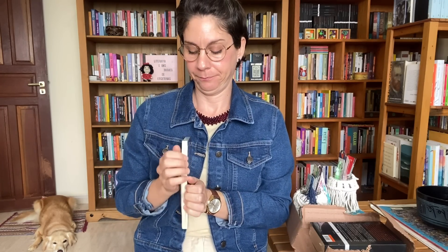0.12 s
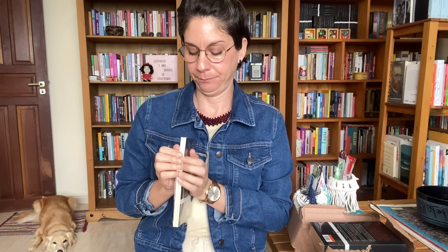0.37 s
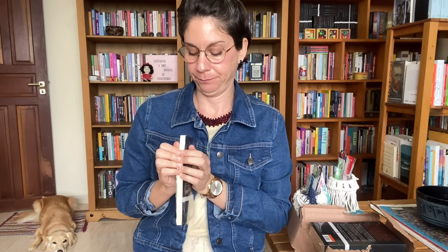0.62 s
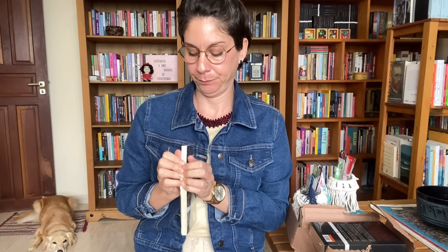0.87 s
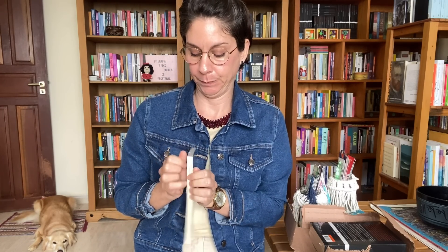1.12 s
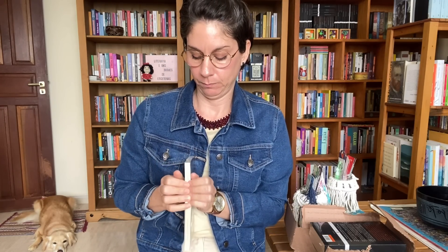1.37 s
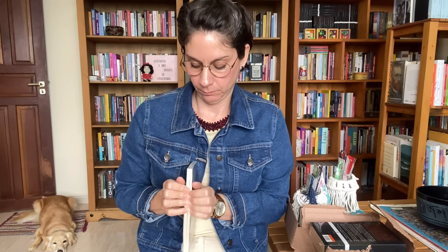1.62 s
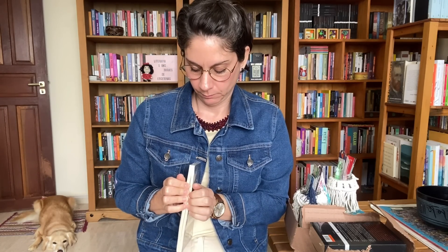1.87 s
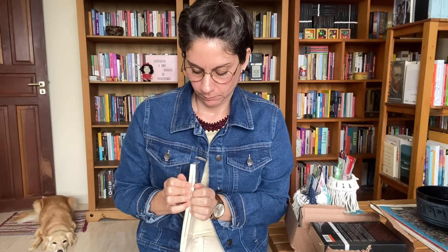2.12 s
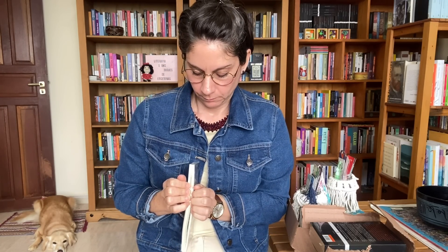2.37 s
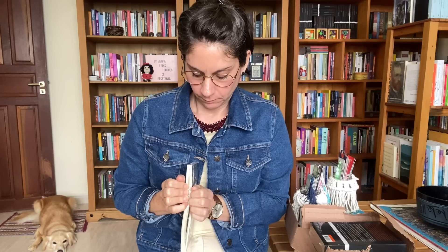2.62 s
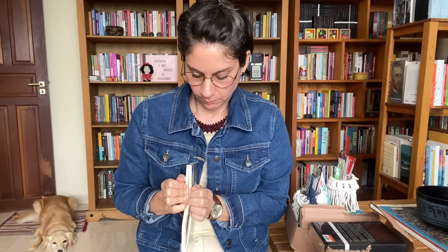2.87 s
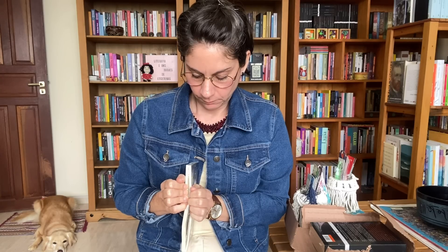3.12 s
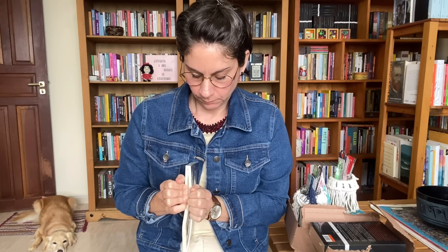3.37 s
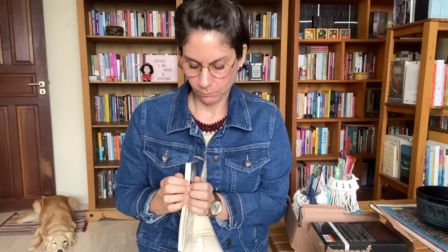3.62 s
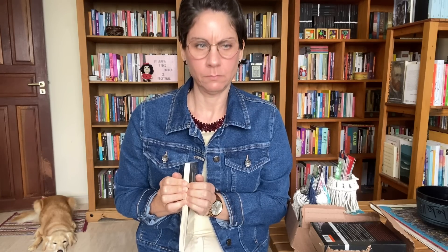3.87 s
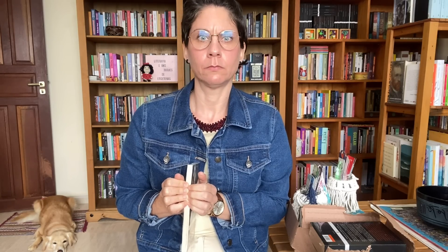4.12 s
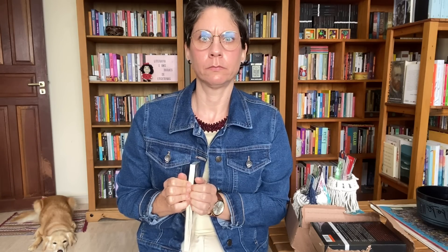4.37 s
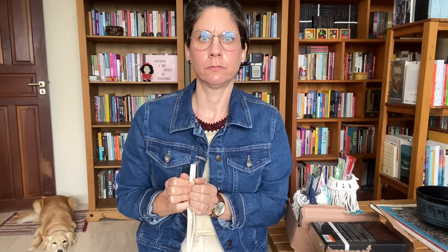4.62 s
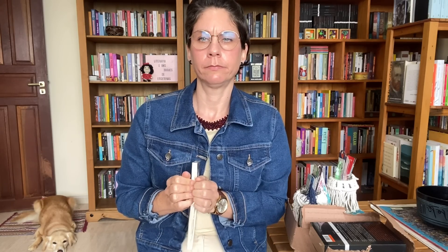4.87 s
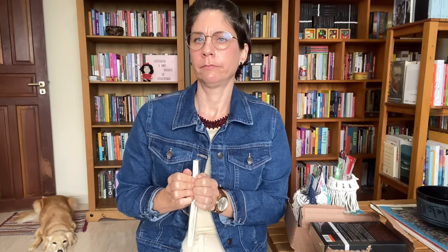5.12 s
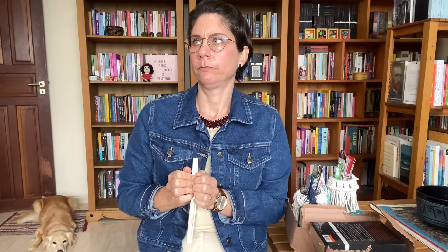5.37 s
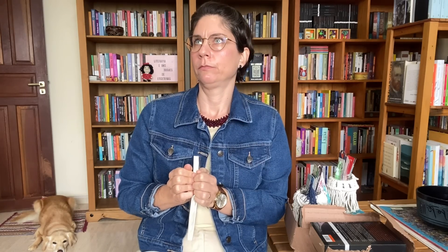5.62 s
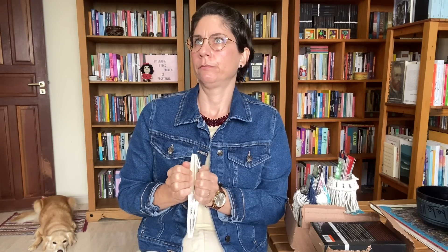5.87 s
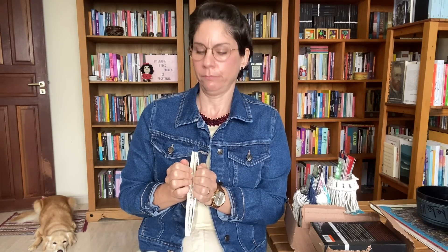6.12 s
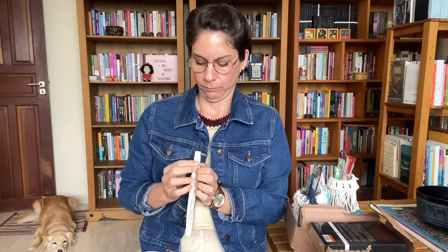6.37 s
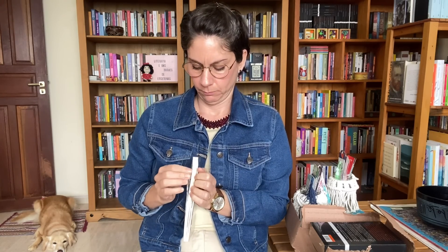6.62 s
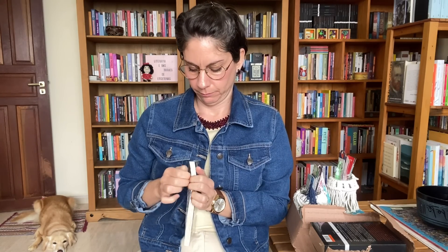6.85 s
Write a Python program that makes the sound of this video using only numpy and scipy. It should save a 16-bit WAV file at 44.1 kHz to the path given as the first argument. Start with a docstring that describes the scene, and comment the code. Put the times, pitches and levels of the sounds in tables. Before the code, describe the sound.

A strip of wrapping paper is pinched and twisted by hand close to the microphone. Bright snaps and crackle open, thicker snaps follow between one and two seconds, then only faint ticks. A short cluster returns after three and a half seconds, and after another sparse stretch the loudest snaps burst out, continuing densely to the end. A small furnished room adds a short tail over low rumble and hiss.

```python
"""A thin strip of wrapping paper is pinched and twisted between two hands in a furnished room.
It opens with a burst of snaps and crackle, snaps thickly again from 1 to 2 s, thins out, and returns
near 3.6 s. The loudest snaps come near 5.9 s, then dense ones to the end. Snaps are short sagging rings,
crackle is clumps of tiny ringing slips coloured by the cupped hands, and tugs are soft low pushes.
Throughout, the room answers with a short tail of noise, over a quiet rumble and hiss of shaped noise."""
import sys
import numpy as np
from scipy import signal
from scipy.fft import rfft, irfft, next_fast_len
from scipy.io import wavfile

SR = 44100
rng = np.random.default_rng(int(sys.argv[2]) if len(sys.argv) > 2 else 0)


def wav_record(signal):
    """Record a signal, one row per channel, as 16-bit PCM in the file named by sys.argv[1]."""
    frames = np.transpose(np.atleast_2d(signal))
    bounded = np.clip(frames, -1, 1)
    # unit amplitude maps onto the largest positive 16-bit level
    quanta = np.round(bounded * 32767).astype(np.int16)
    wavfile.write(sys.argv[1], SR, quanta)


def invert_db(level):
    """Linear amplitude ratio for a level in decibels (20 dB per decade), elementwise."""
    return 10 ** (np.asarray(level, dtype=float) / 20)


N = 308038  # length in samples
PADDED = next_fast_len(N + SR)  # length of the spectra, with room to spare
BINS_HZ = np.maximum(np.arange(PADDED // 2 + 1) * SR / PADDED, 1)

# Creases that buckle. Each row: time in seconds, peak level in dB, strongest pitch in Hz,
# paper's edge above the sheet in dB, body (hands and fold) against the peak in dB before its two offsets.
CREASES = [(0.0186, -39.5, 2400, -4, -3), (0.0322, -31.5, 6440, 4.5, -7.5), (0.0396, -36, 5200, -10, -0.5),
           (0.0516, -29.5, 2380, -1, -10), (0.0756, -33, 5900, 6, -20), (0.08, -29, 6700, 22, -11),
           (0.16, -32, 9000, 25, -5), (0.212, -35, 8350, 18, -17), (0.2228, -35, 3800, 4, -6),
           (0.239, -29, 9600, 11, -20), (0.2496, -20.5, 6200, 20, -20), (0.2592, -19, 3540, -2.5, -6),
           (0.3343, -35.5, 7960, 9, -17), (0.5777, -49, 9700, 17, -18), (0.8521, -43.5, 6540, 13, -28),
           (0.9962, -37, 9650, 24, -3), (1.0, -32.5, 2280, -4.5, -3.5), (1.019, -31.5, 9650, 7, -2),
           (1.0351, -27, 6900, 8, -4.5), (1.0478, -21.5, 5800, -1.5, -4.5),
           (1.0601, -20.5, 8750, 13.5, -14.5), (1.1398, -35, 7800, -2, -4), (1.1524, -27, 3600, 11.5, -5),
           (1.1589, -25.5, 8950, 5, -10), (1.1717, -21.5, 9100, 4, -6), (1.1915, -30.5, 4600, -1, -12.5),
           (1.3956, -47.5, 9200, 9, 5), (1.4298, -35.5, 9450, 4, -5.5), (1.4537, -34, 6340, 3, -4),
           (1.4751, -28, 7000, 3.5, -11.5), (1.5155, -41.5, 3000, 2, 6), (1.577, -20, 4240, -9, -11.5),
           (1.6415, -25, 6600, 0, -5.5), (1.6526, -30.5, 3500, -12, 0.5), (1.6562, -21, 3680, -4, -12),
           (1.7166, -31.5, 6800, 16, -10.5), (1.732, -31.5, 3380, -3, -9), (1.7915, -42.5, 7500, 9, -27),
           (1.8165, -36, 9500, 8, -18), (1.9317, -48, 3300, -15, -24), (1.9515, -39, 9700, 10, -27),
           (1.9673, -41, 9000, 10, -15.5), (2.0866, -38, 4300, 2.5, -14.5), (2.125, -43, 6800, 3, -21),
           (2.1369, -45, 4420, 5, -11), (2.1668, -49, 2600, -0.5, -9), (2.3725, -50, 7700, 13, -19),
           (2.4382, -46.5, 7600, 9, -23), (2.643, -53, 3700, 0, -2), (2.6838, -45, 9600, 10.5, -14),
           (3.0414, -51, 2820, -8, 4), (3.1433, -63.5, 3100, -2, 14.5), (3.2326, -53, 3600, 2, -17),
           (3.371, -49, 4540, 2, -1), (3.487, -45, 5900, -1, -4), (3.5126, -45, 4300, -1, -22),
           (3.532, -30, 5140, -6, -21), (3.5434, -26.5, 7950, 1.5, -12), (3.5992, -30.5, 6700, 5.5, -9),
           (3.623, -30, 6000, -2, -11.5), (3.6334, -26, 7500, 0, -1.5), (3.6888, -28, 4360, -3, -11),
           (3.8113, -30.5, 3350, -1, -0.5), (3.8278, -39, 7000, -1, -1), (3.932, -39, 7700, 13, 2),
           (3.9543, -38.5, 2400, 7, 1), (3.9828, -43, 3120, -4, -12), (3.999, -35.5, 8000, 15, -30),
           (4.0673, -39.5, 8600, 7, -7), (4.166, -47.5, 6850, 20, -25), (4.3092, -42.5, 6500, 1, -14),
           (4.4991, -42.5, 3600, -2, -6), (4.516, -36, 3400, -7, -17), (4.527, -34, 3950, -0.5, -12),
           (4.5824, -24.5, 7040, 9.5, -25), (4.6587, -42.5, 6840, 28, -29), (4.765, -50.5, 7400, 5, -18),
           (4.804, -47, 6800, 18, -21), (4.8554, -43.5, 7800, 24, -29), (4.869, -41, 8800, 18, -31),
           (5.2485, -44.5, 7100, 12, -25), (5.319, -53, 4400, -12, -2), (5.3632, -45, 6500, 1, -11),
           (5.372, -23.5, 3490, -8, -14), (5.4437, -42.5, 7040, 20, -8), (5.6989, -44.5, 9200, 16, -24),
           (5.7413, -36.5, 9600, 17, -35), (5.8425, -20, 5000, 0.5, -18), (5.8619, -14.5, 3500, 3, -18),
           (5.865, -13, 6560, 5, -9.5), (5.8785, -14.5, 6056, -4, -7), (5.8847, -11.5, 3040, -2.5, 0.5),
           (6.0925, -39, 2380, -11, 5), (6.156, -40, 6950, 20, -11), (6.185, -38.5, 8100, 15, -14),
           (6.2161, -38.5, 8200, 18, -8), (6.2377, -35.5, 2800, 2, -5), (6.2543, -33.5, 8400, 11, -5.5),
           (6.2646, -33, 6850, 2, -11), (6.2865, -40, 6600, 11, -24), (6.3289, -33, 7800, 18, -9.5),
           (6.3958, -33.5, 5600, -6, 3), (6.415, -29.5, 8900, 8.5, -5.5), (6.4553, -30.5, 2370, -1.5, 0),
           (6.4735, -31, 4650, -2, -18), (6.4924, -30.5, 6300, 3, -16), (6.5045, -35, 6500, 6, -13),
           (6.5359, -23, 5330, -3, -1), (6.5439, -26, 4800, -7, -16), (6.5483, -29.5, 2380, -8, -26),
           (6.5997, -18, 3100, -1.5, -12), (6.6023, -17, 2740, -5.5, -16), (6.6085, -13, 3800, -16, -22),
           (6.6486, -27.5, 7660, 10, -31), (6.7306, -35, 8850, 7, -31), (6.7611, -29, 8900, 6, -15),
           (6.7855, -37, 6500, 5, -34), (6.8207, -34, 4600, -8, 3.5), (6.8253, -32.5, 6630, 6, -6),
           (6.834, -37, 2390, -2, -7), (6.8719, -16.5, 5997, -1.5, -6), (6.9543, -12.5, 6100, 7, -12.5)]
# The main buckle and the smaller steps close around it. Each row: level in dB (chance makes it up to
# twice as far down), nearest and farthest time from the main buckle in seconds, negative for earlier.
BUCKLE_STEPS = [(0, 0, 0), (-9, -.0006, -.002), (-15.5, -.002, -.006), (-9, .0008, .003), (-8, .003, 0.025)]
# Shape of the grip. Each row: time in seconds, pitch of the hollow of the hands in Hz,
# pitch of the folded strip in Hz.
GRIP_SHAPE = [(0, 1660, 760), (1.05, 1980, 640), (1.5, 1625, 830), (3.9, 1660, 595), (5.4, 2540, 696),
              (5.85, 1510, 926), (6.4, 1795, 710), (6.53, 2280, 590), (6.75, 2370, 610), (6.98, 1990, 890)]


def snaps():
    """A crease gives way in a main buckle, with smaller steps close around it, some trailing up to 25 ms."""
    thump_offset_db, thump_spread_db, hollow_offset_db = -9, 2.5, -2.5
    rows = np.vstack([CREASES, ticks()])
    start_s, peak_db, pitch_hz, tilt_db, body_db = rows.T[:, :, None]
    grip_s, hollow_hz, fold_hz = np.transpose(GRIP_SHAPE)
    spread_db = thump_spread_db * rng.uniform(-1.17, 1, start_s.shape)
    voice = [np.interp(start_s, grip_s, hollow_hz),
             np.interp(start_s, grip_s, fold_hz),
             pitch_hz,
             peak_db + body_db + thump_offset_db + spread_db,
             peak_db + body_db + hollow_offset_db,
             peak_db - np.maximum(tilt_db, 0),  # sheet
             peak_db + np.minimum(tilt_db, 0)]  # edge
    t = np.arange(-88, 600) / SR
    out = np.zeros(N + 4000)
    for step_db, near_s, far_s in BUCKLE_STEPS:
        luck = rng.random((len(start_s), 2)).T[:, :, None]
        offset_s = near_s + (far_s - near_s) * luck[0]
        at = np.round((start_s + t + offset_s) * SR).astype(int)
        np.add.at(out, at, invert_db(step_db * (1.0 + luck[1])) * buckle(t, *voice))
    return out[:N]


def buckle(t, hollow_hz, fold_hz, hz, thump_db, hollow_db, sheet_db, edge_db):
    """A buckle rings the paper's edge, the sheet, the hollow of the hands and a low thump, in that order."""
    luck = rng.random((len(hz), 14)).T[:, :, None]
    # a high strongest pitch belongs to the edge, a lower one to the sheet; the other is drawn
    sheet_hz = np.where(hz < 6000, hz, 3000 + 2500 * luck[0])
    edge_hz = np.where(hz < 6000, 6500 + 2500 * luck[1], hz)
    edge = wavelet(t, edge_hz, 0.00025, 0.00016, -0.00014, luck[2])
    edge += invert_db(-1.5) * wavelet(t, 11000 + 3500 * luck[3], 0.000082, 0.00026, -0.00021, luck[4])
    sheet = wavelet(t, sheet_hz, 0.00023, 0.00025, 0, luck[5])
    sheet += invert_db(-2.5) * wavelet(t, 2400 + 3600 * luck[6], 0.00059, 0.00018, 0.000418, luck[7])
    hollow = wavelet(t, hollow_hz * (0.93 + 0.15 * luck[8]), 0.00025, 0.0014, 0.00062, luck[9])
    thump = wavelet(t, fold_hz * (0.9 + 0.45 * luck[10]), 0.00039, 0.0014, 0.001, luck[11])
    thump += invert_db(-12.0) * wavelet(t, fold_hz * (0.35 + .5 * luck[12]), 0.00026, 0.0038, 0.0021, luck[13])
    return invert_db(edge_db) * edge + invert_db(sheet_db) * sheet + invert_db(hollow_db) * hollow + invert_db(thump_db) * thump


def wavelet(t, hz, rise_s, fall_s, late_s, phase):
    """A ring that swells, peaks and dies; its pitch sags, as bending waves bring the highs first."""
    u = t - late_s
    swell = np.exp(-(u / rise_s) ** 2)
    decay = np.exp(-np.maximum(u, 0) / fall_s)
    shape = np.where(u < 0, swell, decay)
    sag = 0.17 * fall_s * np.log(np.cosh(u / fall_s))
    return shape * np.cos(2 * np.pi * (hz * (u - sag) + phase))  # phase in turns


def ticks():
    """Small creases give way at random, more often under strong twisting; rows like the creases' table."""
    count = 110
    rate_follows = 0.35  # share of the effort's dB that shows in how often they come
    above_crackle_db, spread_db = 13, 6.5
    tilt_db_per_octave = 16  # higher ticks ring the edge more than the sheet
    weakest_body_db = -16
    t = np.arange(0, N, 40) / SR
    effort_s, bright_db, _ = np.transpose(TWIST_EFFORT)
    effort_db = np.interp(t, effort_s, bright_db)
    chance = np.cumsum(invert_db(rate_follows * effort_db))
    luck = rng.random((count, 4)).T
    start_s = np.interp((np.arange(count) + luck[0]) / count, chance / chance[-1], t)
    octaves = 2 * luck[1] - 1
    peak_db = np.interp(start_s, t, effort_db) + above_crackle_db + spread_db * (2 * luck[2] - 1)
    pitch_hz = 4800 * 2 ** octaves
    return np.transpose([start_s, peak_db, pitch_hz, tilt_db_per_octave * octaves, weakest_body_db * luck[3]])


# Twisting effort heard as fine crackle. Each row: time in seconds, level of the bright grains in dB,
# level of the dull grains in dB.
TWIST_EFFORT = [(0.0, -70, -76), (0.11, -49.5, -61.5), (0.37, -73.5, -81), (0.56, -79, -80.5),
                (1.1, -75, -75.5), (1.61, -66, -65.5), (1.85, -75.5, -71), (2.21, -88, -86),
                (3.07, -87.5, -82), (3.44, -73, -83), (3.69, -65, -75), (4.1, -87.5, -90),
                (4.72, -79.5, -71.5), (4.94, -85.5, -81), (5.77, -90, -86.5), (5.92, -57.5, -79),
                (6.3, -57.5, -64), (6.53, -53, -58), (6.7, -61, -75.5), (6.98, -50.5, -49.5)]
# How the grip colours dull grains, first the hollow of the hands, then the folded strip.
# Each row: width of the ringing band in Hz, gain of that band in dB before the sum is levelled.
GRIP_BANDS = [(450, 2), (302, -2)]


def crackle():
    """Bright and dull grains follow the twisting effort; the dull ones ring the fold and the hands."""
    effort_s, bright_db, dull_db = np.transpose(TWIST_EFFORT)
    t = np.arange(N) / SR
    grip_s, *grip_hz = np.transpose(GRIP_SHAPE)
    bright = invert_db(np.interp(t, effort_s, bright_db)) * grains(1500, 2200, 15500, 1.3, 2.4)
    slips = grains(600, 400, 2620, 1.4, 5.0)
    dull = slips.copy()
    for hz, (width_hz, gain_db) in zip(grip_hz, GRIP_BANDS):
        dull += invert_db(gain_db) * moving_band(slips, np.interp(t, grip_s, hz), width_hz)
    return bright + invert_db(np.interp(t, effort_s, dull_db)) * rms_one(dull)


def grains(per_s, low_hz, high_hz, cycles, spread_db):
    """Tiny slips come in clumps, each ringing a few cycles at one of 14 pitches; rms 1."""
    sizes = invert_db(spread_db * np.minimum(rng.exponential(1, N), 4)) * rng.choice([-1, 1], N)
    born = rng.random(N) < per_s * invert_db(5.0 * drift(25)) / SR  # the drifting rate makes clumps
    dealt = rng.integers(0, 14, N)  # which pitch each slip gets
    out = 0
    for k, hz in enumerate(np.geomspace(low_hz, high_hz, 14)):
        r = np.exp(-hz / cycles / SR)
        w = 2 * np.pi * hz / SR
        slips = sizes * born * (dealt == k) + 1e-18
        ring = signal.lfilter([1, 0, -1], [1, -2 * r * np.cos(w), r * r], slips)
        out = out + np.sqrt(1 - r) * ring
    return rms_one(out)


def moving_band(x, hz, width_hz):
    """A band-pass whose centre follows hz: shift down, low-pass, shift back."""
    turn = np.exp(2j * np.pi * np.cumsum(hz) / SR)
    low_pass = signal.butter(2, width_hz / 2, fs=SR, output="sos")
    return 2 * (signal.sosfilt(low_pass, x / turn) * turn).real


# Knuckles and strip pulled taut. Each row: time in seconds, peak level in dB, pitch in Hz.
TAUT_PULLS = [(1.169, -42, 310), (3.633, -45, 394), (3.812, -68, 397), (3.954, -52, 400),
              (4.722, -52.5, 344), (5.881, -37, 221), (6.954, -56, 274)]


def tugs():
    """A strip pulled taut gives a soft low push of a few cycles."""
    start_s, peak_db, hz = np.transpose(TAUT_PULLS)[:, :, None]
    t = np.arange(-300, 2000) / SR
    out = np.zeros(N + 4000)
    at = np.round((start_s + t) * SR).astype(int)
    push = wavelet(t, hz, 0.004, 0.0036, 0.0029, rng.random(start_s.shape))
    np.add.at(out, at, invert_db(peak_db) * push)
    return out[:N]


# How long the room rings. Each row: pitch in Hz, time to fall by 60 dB in seconds.
RING_TIME = [(300, 0.37), (800, 0.4), (2000, 0.3), (5500, 0.33), (14000, 0.27)]
# How strongly the room rings. Each row: pitch in Hz, energy of the tail against the direct sound in dB.
TAIL_LEVEL = [(300, 1.5), (1000, 2), (3000, -2.5), (7000, -5.5), (14000, -8)]


def room(x):
    """Dense reflections: each band's energy builds up after the path to the walls and dies away as noise."""
    path_s, build_s = 0.0034, 0.00043
    edges = 150 * 2 ** np.arange(0, 7, 1 / 3)  # bands a third of an octave wide
    white = rng.standard_normal((2, 2, N))
    late = np.concatenate([np.zeros(int(path_s * SR)), x])[:N]
    build = np.exp(-1 / (build_s * SR))
    tail = 0
    for k, (low, high) in enumerate(zip(edges, edges[1:])):
        hz = np.sqrt(low * high)
        fade = invert_db(-120 / (at_hz(RING_TIME, hz) * SR))  # energy, so 60 dB counts twice
        rise_and_fall = np.convolve([1, -fade], [1, -build])
        energy = signal.lfilter([(1 - fade) * (1 - build)], rise_and_fall, band(late, low, high) ** 2)
        noise = rms_one(band(white[k % 2], low, high))  # neighbouring bands use separate noise
        tail = tail + invert_db(at_hz(TAIL_LEVEL, hz)) * np.sqrt(np.abs(energy)) * noise
    return irfft(diffuse_pair(rfft(tail, PADDED)), PADDED)[:, :N]


# Tone of the background before it is levelled. Each row: pitch in Hz, strength in dB per Hz.
AIR_TONE = [(15, -27), (30, -8.5), (55, 1), (120, -6.5), (250, -9), (500, -16), (1000, -20), (2000, -25),
            (4000, -28.5), (9000, -33.5), (13500, -37.5), (16000, -55)]


def air():
    """Low rumble of the house and microphone hiss, as shaped noise; the level wanders a little."""
    level_db, wander_db = -64, 1.04
    spectra = rfft(rng.standard_normal((2, PADDED))) * invert_db(at_hz(AIR_TONE, BINS_HZ))
    noise = rms_one(irfft(diffuse_pair(spectra), PADDED)[:, :N])
    return invert_db(level_db + wander_db * drift(1.0)) * noise


# How alike left and right are in spread-out sound. Each row: pitch in Hz, likeness from 0 to 1.
SIDE_LIKENESS = [(30, 0.6), (300, 0), (2000, 0), (5500, 0), (6800, 0.4), (7800, 0.87), (16000, 1)]


def diffuse_pair(spectra):
    """Two unrelated spectra become left and right, alike by band."""
    alike = np.clip(at_hz(SIDE_LIKENESS, BINS_HZ), 0, 1)
    shared = np.sqrt((1 + alike) / 2) * spectra[0]
    opposed = np.sqrt((1 - alike) / 2) * spectra[1]
    return shared + opposed * [[1], [-1]]


def drift(rate_hz):
    """Slow random wandering with rms 1: low-passed noise, made every 40 samples and joined by lines."""
    r = np.exp(-2 * np.pi * rate_hz * 40 / SR)
    noise = rng.standard_normal(N // 40 + 2002)
    slow = signal.lfilter([1], [1, -2 * r, r * r], noise)[2000:]  # skip the filter's start
    return np.interp(np.arange(N) / 40, np.arange(len(slow)), rms_one(slow))


def band(x, low_hz, high_hz):
    """Keep mainly the sound between two pitches."""
    return signal.sosfilt(signal.butter(2, [low_hz, high_hz], "band", fs=SR, output="sos"), x)


def at_hz(points, hz):
    """Read a table between its rows, on a log-frequency axis."""
    table_hz, values = np.transpose(points)
    return np.interp(np.log(hz), np.log(table_hz), values)


def rms_one(x):
    """Scale to unit rms."""
    return x / np.sqrt(np.mean(x ** 2) + 1e-20)


def scene():
    """Paper close in front, a touch louder on the right, with its room tail and the background."""
    paper = snaps() + crackle() + tugs()
    sides_db = np.array([[-.25], [.25]])
    return paper * invert_db(sides_db) + room(paper) + air()


# The two microphone ports. Each row: pitch in Hz, how far the left leads the right in radians.
PORT_LEAD = [(0, 0), (1700, -.1), (4500, -.5), (7000, -1.2), (8000, 0), (10500, 3.1), (13100, 6.3),
             (15400, 9.4), (17000, 10)]
# Colour of the microphone. Each row: pitch in Hz, gain in dB.
MICROPHONE_COLOUR = [(100, 0), (5000, 0), (9000, 1.5), (12000, 1), (14500, 0.5), (16300, -5)]


def top_cut(x):
    """Nothing passes above the cut-off."""
    return signal.sosfilt(signal.butter(12, 16680, fs=SR, output="sos"), x)


def record(dry):
    """Microphone colour and a phase turn between its two ports, shared equally by left and right."""
    lead = np.interp(BINS_HZ, *np.transpose(PORT_LEAD))
    ports = invert_db(at_hz(MICROPHONE_COLOUR, BINS_HZ)) * np.exp(.5j * lead * [[1], [-1]])
    mix = irfft(rfft(dry, PADDED) * ports, PADDED)[:, :N]
    return top_cut(mix)


dry = scene()
out = record(dry)
wav_record(out)
```